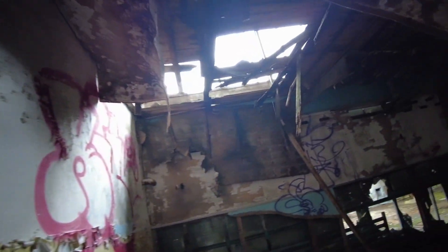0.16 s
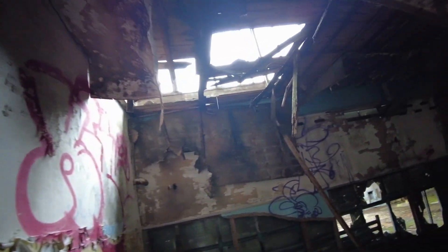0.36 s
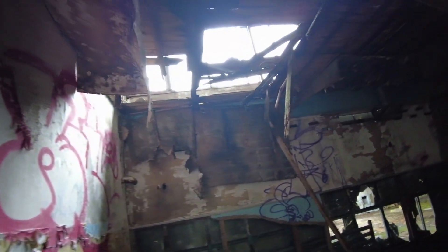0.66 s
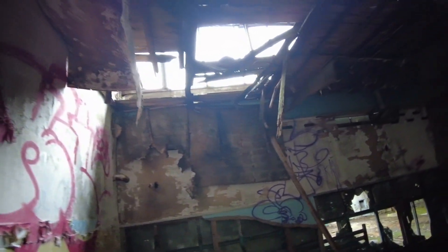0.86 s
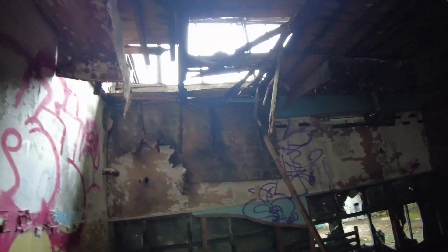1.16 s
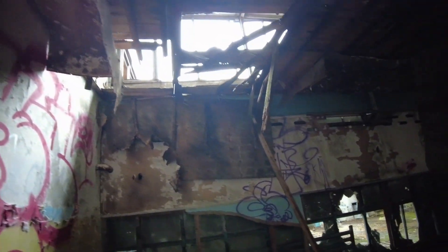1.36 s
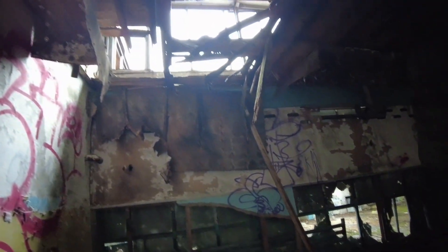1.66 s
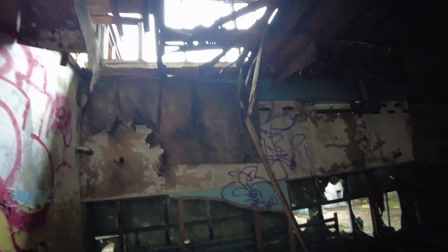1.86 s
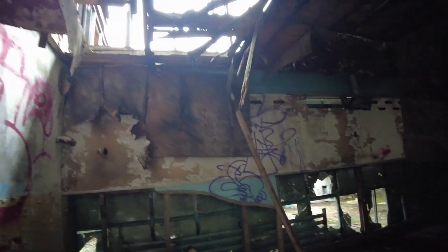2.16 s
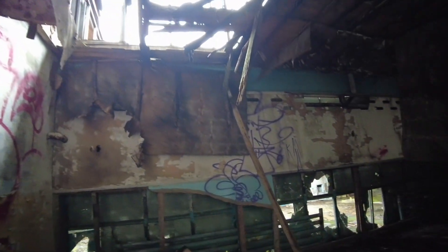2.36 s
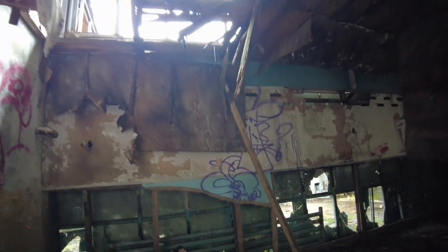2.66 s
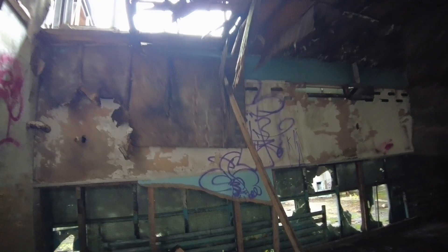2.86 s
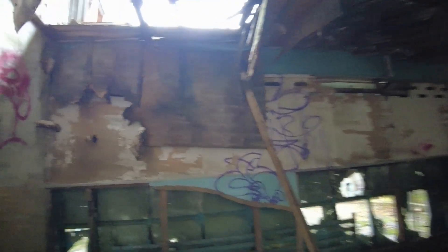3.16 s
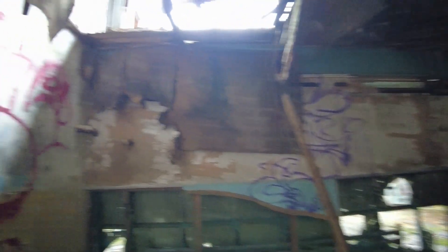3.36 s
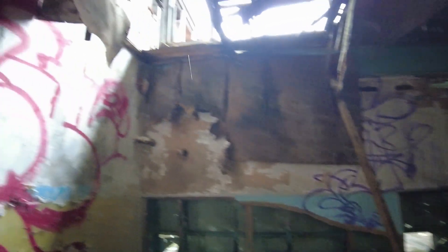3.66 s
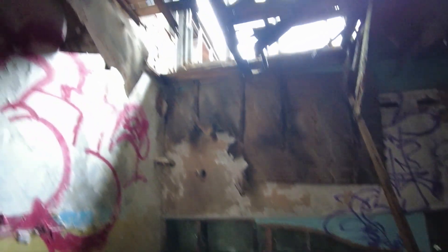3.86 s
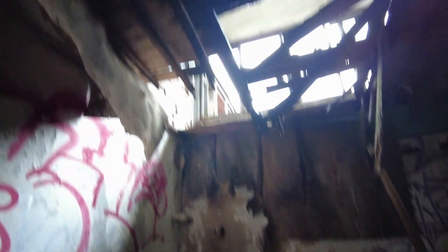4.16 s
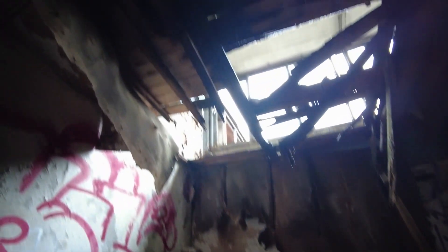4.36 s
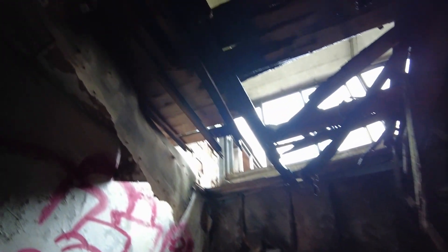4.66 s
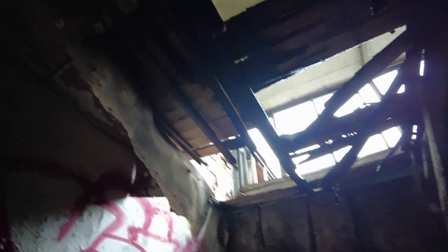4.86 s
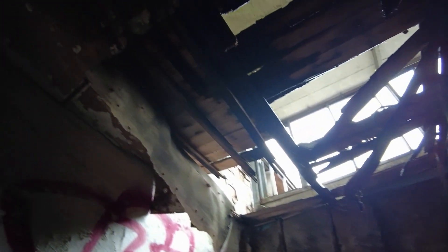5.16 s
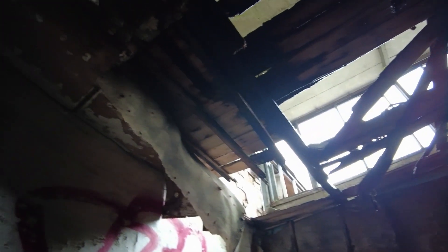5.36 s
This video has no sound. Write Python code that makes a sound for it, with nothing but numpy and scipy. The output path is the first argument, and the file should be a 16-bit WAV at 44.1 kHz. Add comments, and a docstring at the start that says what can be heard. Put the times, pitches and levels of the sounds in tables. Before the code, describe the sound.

Irregular footsteps crunch and crack over rubble and loose boards in a bare derelict building, loudest near three seconds, then almost still.

```python
"""Pieces of rubble and splinters crack and tick, boards knock and a loose panel rings as shoes shift over them.
Soles scuff by stick-slip and grit crunches as dense random grains in a bare, half-roofed building.
Breaks are decaying noise and tones; boards and panel are sums of damped modes.
Near walls return two echoes and a short diffuse tail; below lie a soft outdoor wash and a low air flutter,
both shaped from noise. Left and right differ in phase and level by frequency, which widens the floor sounds."""
import sys
import numpy as np
from scipy import signal
from scipy.fft import rfft, irfft, next_fast_len
from scipy.io import wavfile
from scipy.ndimage import uniform_filter1d

SR = 44100
rng = np.random.default_rng(int(sys.argv[2]) if len(sys.argv) > 2 else 0)


def int16_out(signal):
    """Quantize to a 16-bit WAV file."""
    q = np.round(np.clip(np.atleast_2d(signal).T, -1, 1) * 32767)
    wavfile.write(sys.argv[1], SR, q.astype(np.int16))


N = 243652  # samples

# Grit under the soles. Each row: time in seconds, relative crunch level in dB, sand level over it in dB.
GRIT_COURSE = [(0.0, -64.5, -11), (0.28, -64.5, -14), (0.4, -72, -13), (0.71, -63.5, -4),
               (0.95, -72.5, -11), (1.15, -69.5, -2), (1.19, -62, -6), (1.25, -64, -3), (1.37, -50.5, -15),
               (1.43, -62.5, -15), (1.47, -58, -8), (1.58, -68.5, -2), (1.74, -71.5, -6), (1.8, -53.5, -10),
               (1.9, -56.5, -3.5), (1.93, -52.5, 1.5), (1.96, -55, -2.5), (2.05, -64.5, -5),
               (2.22, -61, -5), (2.3, -53, -6), (2.5, -65.5, -6), (2.67, -65.5, -3), (2.76, -54.5, -2.5),
               (2.95, -55, -8), (3.19, -56, -2.5), (3.26, -56, -40), (3.44, -63, -15), (4.33, -75, -10),
               (4.65, -76.5, -2.5), (4.9, -80, -1.5), (5.52, -78, -6.5)]
SIDES = np.array([[1], [-1]])  # left, right


def undb(db):
    """Level to amplitude: 20 dB is a factor of ten."""
    return 10 ** (np.asarray(db) / 20)


def unit(x):
    """Normalization to a root-mean-square of one."""
    return x / np.sqrt(np.mean(x ** 2))


def band(x, lo_hz, hi_hz):
    """Butterworth band-pass filtering."""
    edges = [lo_hz, min(hi_hz, .45 * SR)]
    return signal.sosfilt(signal.butter(2, edges, "bandpass", fs=SR, output="sos"), x)


def on_log(table, hz):
    """Interpolation of (Hz, value) rows on a log-frequency axis."""
    f, v = np.transpose(table)
    return np.interp(np.log(np.maximum(hz, 1)), np.log(f), v)


def curve(table):
    """Linear interpolation in time of every column after the first."""
    s, *columns = np.transpose(table)
    return [np.interp(np.arange(N) / SR, s, c) for c in columns]


def fade(t, t60):
    """Exponential decay: 60 dB in t60 seconds."""
    return np.exp(-np.log(1000) * t / t60)


def add(out, s, x, pan_db, around=None):
    """Superposition of a sound on three rows: left, right, and what the walls receive."""
    i = int(s * SR)
    size = min(x.shape[-1], N - i)
    out[:2, i:i + size] += x[..., :size] * undb(SIDES * pan_db / 2)
    out[2, i:i + size] += (x if around is None else around)[:size]


def diffuse(gain, size):
    """Coherence: noise alike in the bass, partly opposed near 1 kHz, alike at 1.2 kHz, loosely related above."""
    # Each row: frequency in Hz, likeness of left and right from -1 to 1.
    likeness = [(30, 0.99), (100, 0.96), (300, 0.91), (600, 0.24), (800, -0.13), (950, -0.32),
                (1120, -0.19), (1230, 0.89), (1900, 0.28), (3000, 0.27), (6000, 0.21)]
    hz = np.fft.rfftfreq(size, 1 / SR)
    like = on_log(likeness, hz)
    mid, side = rfft(rng.standard_normal((2, size)))
    return irfft(gain(hz) * (np.sqrt(1 + like) * mid + SIDES * np.sqrt(1 - like) * side), size)


def walk(rate):
    """Smoothed random modulation: levels held 1 / rate seconds, then averaged twice over that time."""
    k = int(SR / rate)
    held = np.repeat(rng.standard_normal(N // k + 1), k)
    return uniform_filter1d(uniform_filter1d(held, k), k)[:N]


def outdoor_wash():
    """Spectrally shaped diffuse noise: a distant wash whose low, middle and high parts swell on their own."""
    # Each row: frequency in Hz, relative spectral level in dB per Hz.
    wash_spectrum = [(45, -21), (70, -6), (210, -8), (550, -10), (980, -3.5), (1540, -11.5), (2300, -27.5),
                     (3200, -21), (7000, -31), (15000, -54)]
    wash_db, swell_db = -60.5, 2.5  # swell before smoothing
    wash = unit(diffuse(lambda f: undb(on_log(wash_spectrum, f)), next_fast_len(N))[:, :N])
    parts = [(60, 258), (260, 986), (1200, 14000)]  # Hz
    return sum(band(wash, lo, hi) * undb(wash_db + swell_db * walk(4.8)) for lo, hi in parts)


def air_flutter():
    """Slow air movement on the microphones: low-frequency noise with a level course and random gusts."""
    # Each row: time in seconds, level before gusts in dB.
    air_course = [(0.0, -54), (0.8, -57.5), (1.5, -62), (2.3, -57), (2.8, -55.5), (3.6, -63), (4.2, -61.5),
                  (5.0, -65.5), (5.52, -58)]
    centre_hz, gusts_per_s, gust_db = 32.5, 13, 4.5  # gust before smoothing
    air = diffuse(lambda f: 1 / (1 + (np.abs(f - centre_hz) / 16) ** 1.96), next_fast_len(N))
    return unit(air[:, :N]) * undb(curve(air_course)[0] + gust_db * walk(gusts_per_s))


def hall(x):
    """Reverberation as convolution with decaying noise: every band of the tail dies at its own rate."""
    # Each row: band centre in Hz, decay time t60 in seconds, relative level in dB.
    tail_bands = [(160, 0.9, -11.5), (380, 0.36, -7.5), (1140, 0.58, -11.5), (2800, 0.48, -11),
                  (5530, 0.38, -8), (14700, 0.26, -16)]
    lump_db, lumps_per_s = 3, 700
    t = np.arange(SR) / SR
    tail = 0
    for hz, t60, db in tail_bands:
        part = diffuse(lambda f: np.exp(-np.log2(np.maximum(f, 1) / hz) ** 2 / 1.66), SR)
        # a band's share of the spectrum grows with its centre
        tail = tail + undb(db) * unit(part) * fade(t, t60) * np.sqrt(2 * hz / SR)
    # the tail sets in after 4 ms
    tail = tail * np.clip((t - .004) / 0.00078, 0, 1) / np.sqrt(0.013 * SR)
    # the young tail is uneven, the late tail smooth
    tail = tail * undb(lump_db * fade(t, 0.18) * unit(walk(lumps_per_s)[:SR]))
    return signal.fftconvolve(x[None], tail * undb(SIDES * 0.26), axes=1)[:, :N]


def near_walls(x):
    """Specular reflection: each near wall returns one delayed, weaker copy."""
    # Each row: delay in seconds, level against the direct sound in dB.
    wall_echoes = [(0.0095, -12.5), (0.0202, -15)]
    echoes = 0
    for s, db in wall_echoes:
        echoes = echoes + undb(db) * np.pad(x, ((0, 0), (int(s * SR), 0)))[:, :N]
    return echoes


def widen(x):
    """Stereo widening: phase and level differ between left and right by frequency, most just below 1.2 kHz."""
    # Each row: frequency in Hz, phase lag of the right channel in radians.
    right_lag = [(200, 0.48), (350, 1.16), (550, 0.97), (850, 1.98), (1120, 2.57), (1230, 0.52),
                 (2500, 1.32), (4000, 1.27)]
    # Each row: frequency in Hz, level of left over right in dB.
    left_over_right = [(60, 0), (500, 3), (3000, -2.5), (14000, 0.5)]
    size = next_fast_len(N)
    hz = np.fft.rfftfreq(size, 1 / SR)
    tilt = undb(SIDES * on_log(left_over_right, hz) / 2)
    turn = np.exp(-1j * on_log(right_lag, hz) * [[0], [1]])
    return irfft(rfft(x, size) * tilt * turn, size)[:, :N]


def grit():
    """Random impulse trains through band-pass filters: dense grains, coarse stones lower than sand."""
    crunch_db, treble_db = curve(GRIT_COURSE)
    stir_db = 5  # before smoothing
    # grains per second, band edges in Hz, level against the crunch in dB
    kinds = [(386.0, 210, 1280, -1.5), (1450, 424, 2820, 0), (1200, 1400, 21800, treble_db)]
    layers = []
    for rate, lo_hz, hi_hz, db in kinds:
        happens, sign, size = rng.random((3, N))
        size_db = np.minimum(-3.5 * np.log(size + 1e-9), 12)
        grains = (happens < rate / SR) * np.sign(sign - .5) * undb(size_db)
        layers.append(undb(db + stir_db * walk(40)) * unit(band(grains, lo_hz, hi_hz)))
    # slightly louder on the left; the tail receives the grit at full level
    return undb(crunch_db) * sum(layers) * undb([[.7], [-.7], [0]])


def scuffs(out):
    """Stick-slip friction of a dragged sole: uneven noise in two resonances over a wide hiss."""
    # Each row: start in seconds, length in seconds, relative level in dB, squeal in Hz, half-width as a
    # share of it, second squeal in Hz, its level over the first in dB, hiss level over the first in dB.
    drags = [(1.351, 0.026, -52, 1430, .06, 3000, -24, -29),
             (1.762, 0.06, -47.5, 1280, 0.093, 3470, -5, 0.5), (2.721, 0.09, -47, 1100, .2, 3300, -4, -5),
             (3.9714, 0.1, -52, 3040, 0.052, 7800, -12, -9),
             (4.638, 0.055, -71.5, 1380, 0.083, 3320, -0.5, -6),
             (5.092, 0.14, -66.5, 1390, .2, 2980, -10, -16)]
    for s, length, db, hz, width, hz2, db2, hiss_db in drags:
        t = np.arange(int(length * SR)) / SR
        grip = undb(4 * np.repeat(rng.standard_normal(200), 100)[:len(t)])  # held for 100 samples
        slip = rng.standard_normal((3, SR // 5))[:, :len(t)] * grip
        squeal = unit(band(slip[0], (1 - width) * hz, (1 + width) * hz))
        second = undb(db2) * unit(band(slip[1], 0.88 * hz2, 0.99 * hz2))
        hiss = undb(hiss_db) * unit(band(slip[2], 2600, 7600))
        ramps = np.minimum(1, np.minimum(t / 0.004, (length - t) / 0.01))
        rub = undb(db) * ramps * fade(t, 0.43) * (squeal + second + hiss)
        add(out, s, rub, .5, undb(3.0) * rub)


def panel(out):
    """Modal vibration: a kicked loose panel rings in damped modes, shared out anew at each blow."""
    # Each row: mode in Hz, relative level in dB, decay time t60 in seconds.
    panel_modes = [(490, -44, 0.064), (955, 3.5, 0.12), (1100, -36, 0.21), (1210, -9, 0.19),
                   (1298, -8, 0.13), (1455, -3, 0.35), (1680, -29, 0.58), (1842, -13.5, 0.14),
                   (2460, -13, 0.18), (2660, -5, 0.12)]
    # Each row: time in seconds, relative level in dB.
    blows = [(2.729, -42), (2.752, -41), (2.822, -29.5), (2.994, -57)]
    t = np.arange(SR // 2) / SR
    for s, db in blows:
        share = undb(1.6 * rng.standard_normal(len(panel_modes)))
        ring = 0
        for g, (hz, mode_db, t60) in zip(share, panel_modes):
            ring = ring + g * undb(mode_db) * fade(t, t60) * np.sin(2 * np.pi * hz * t)
        add(out, s, undb(db) * ring, 1.2)


def knocks(out):
    """Impact and modal decay: a board rings in three modes, the higher dying sooner; the floor thuds."""
    # Each row: time in seconds, relative level in dB, ring in Hz, ring t60 in seconds.
    board_knocks = [(0.223, -38, 640, 0.015), (0.448, -32, 485, 0.012), (0.553, -33.5, 610, 0.017),
                    (0.562, -38.5, 557, 0.018), (0.8499, -38, 1020, 0.014), (0.857, -41, 1050, 0.027),
                    (0.864, -34, 900, 0.01), (0.867, -45, 1200, 0.017), (1.28, -41, 582, 0.064),
                    (1.343, -32.5, 623, 0.027), (1.351, -28, 420, 0.011), (1.3594, -27.5, 583, 0.019),
                    (1.345, -40.5, 221, 0.052), (1.369, -31, 646, 0.015), (1.492, -43.5, 626, 0.045),
                    (1.788, -29, 820, 0.016), (1.796, -29, 587, 0.025), (1.988, -41, 690, 0.027),
                    (2.193, -46.5, 376, 0.056), (2.236, -37, 400, 0.023), (2.244, -34.5, 620, 0.022),
                    (2.256, -13, 383, 0.015), (2.2744, -33, 340, 0.037), (2.311, -32.5, 850, 0.047),
                    (2.75, -34.5, 385, 0.024), (2.291, -38, 330, 0.035), (2.314, -30.5, 350, 0.045),
                    (2.8215, -12.5, 490, 0.017), (2.8229, -16, 915, 0.036), (2.84, -32, 315, 0.02),
                    (2.875, -37, 937, 0.073), (2.851, -31, 590, 0.08), (2.884, -40, 466, 0.0077),
                    (3.163, -39.5, 380, 0.054), (3.242, -39, 453, 0.045), (3.254, -35, 496, 0.033),
                    (3.29, -25, 382, 0.019), (3.303, -41, 403, 0.024), (3.314, -38.5, 292, 0.024),
                    (3.344, -36.5, 205, 0.032), (3.351, -43, 474, 0.03), (3.488, -32, 380, 0.015),
                    (3.491, -41.5, 570, 0.027), (3.503, -47.5, 212, 0.041), (3.541, -44.5, 237, 0.05),
                    (3.809, -52, 390, 0.033), (4.491, -52, 205, 0.022), (4.548, -48, 200, 0.042),
                    (4.567, -47, 260, 0.04), (4.595, -52, 450, 0.033), (4.611, -47, 190, 0.016),
                    (4.68, -48, 220, 0.02), (5.0135, -38, 860, 0.011), (5.016, -49, 720, 0.026),
                    (5.067, -52.5, 330, 0.016)]
    thud_db, thud_db_per_octave = -11, -13  # under a 240 Hz board; lighter boards shake the floor less
    thud_growth = 0.94  # dB of thud per dB of knock, about a -35 dB knock
    floor_hz, slab_hz, slab_db, floor_t60_s = 124.8, 70.4, -11, 0.12  # slab: deeper mode of the floor
    rise_cycles = 0.17  # a sole presses a low board for longer
    modes = [(.66, 0.17), (1, 1), (1.45, 0.29)]  # frequency ratio, gain
    t = np.arange(SR // 4) / SR
    for s, db, hz, t60 in board_knocks:
        floor_db = thud_db + thud_db_per_octave * np.log2(hz / 240) + (thud_growth - 1) * (db + 35)
        board = sum(g * fade(t, t60 / k) * np.sin(2 * np.pi * k * hz * t) for k, g in modes)
        # a small board cannot radiate deep bass
        board = band((1 - np.exp(-t * hz / rise_cycles)) * board, 175, 3500)
        floor = np.sin(2 * np.pi * floor_hz * t) + undb(slab_db) * np.sin(2 * np.pi * slab_hz * t)
        thud = undb(floor_db) * (1 - np.exp(-t / 0.0012)) * fade(t, floor_t60_s) * floor
        knock = undb(db) * (board + thud)
        add(out, s, knock, -2, undb(-2.0) * knock)


def splinters():
    """A random point process: small pieces crack oftener and louder while the grit crunches harder."""
    count, over_crunch_db, spread_db = 75, 2, 5.5
    body_hz, chip_hz = 1600, 3600  # medians
    colour_db = (6.5, 2, -13)  # body, chip, snap
    breaking = (5.5, 0.22, 0.5)  # breaking time in ms, share of ring 0-1, level sent to the walls in dB
    crunch_db = curve(GRIT_COURSE)[0]
    busy = np.cumsum(np.sqrt(undb(crunch_db)))
    times = np.interp(rng.random(count), busy / busy[-1], np.arange(N) / SR)
    size, pitch, chip = rng.standard_normal((count, 3)).T
    levels = crunch_db[(times * SR).astype(int)] + over_crunch_db + spread_db * size
    bodies, chips = body_hz * np.exp(0.36 * pitch), chip_hz * np.exp(0.23 * chip)
    body_db, chip_db, snap_db = colour_db
    return [(s, db, hz, body_db, high_hz, chip_db, snap_db, *breaking)
            for s, db, hz, high_hz in zip(times, levels, bodies, chips)]


def cracks(out):
    """Brittle fracture, a few milliseconds of release: a dull body, a ring, a higher chip and a bright snap."""
    # Each row: time in seconds, relative level in dB, ring in Hz, body under 1.2 kHz in dB, chip in Hz,
    # chip in dB, snap over 7.5 kHz in dB, breaking time in ms, share of ring 0-1, level sent to walls in dB.
    pieces = [(0.0074, -36, 1350, -4, 3080, -37, -48, 2.8, 0.37, -4.5),
              (0.0907, -58, 2000, -13, 5230, 0, -22, 2.9, 0.6, 5),
              (0.1101, -48, 1460, -17, 3030, -8, -29, 3, 0.63, 11),
              (0.1683, -43.5, 1510, -11, 3000, -7.5, -11, 2.7, 0.6, 9.5),
              (0.2224, -31.5, 1900, -7.5, 3440, -24, -15.5, 3.1, 0.32, 2.5),
              (0.2316, -35, 1390, -11, 2580, -5.5, -25, 2.4, 0.54, -17),
              (0.4239, -37, 2620, -3.5, 3900, -4.5, -9, 2.8, 0.3, 5.5),
              (0.447, -22.5, 2050, -38, 3000, -6, -30, 2.14, 0.37, -0.5),
              (0.4553, -28, 1610, -27, 3000, -17, -47, 2.8, 0.7, 6),
              (0.4649, -36.5, 1575, 1, 3030, -6, -46, 5.7, 0.8, -3),
              (0.4786, -28.5, 1680, -26, 4200, -13, -15, 3, 0.4, -4.5),
              (0.4938, -36.5, 1860, -15, 3620, -24, -10, 3.5, 0.35, 5),
              (0.553, -31.5, 1420, -17, 3100, -19, -10, 1.7, 0.65, 6),
              (0.574, -44, 1390, -22, 3600, -4, -11, 7.6, 0.36, 7.5),
              (0.609, -44.5, 1230, -4, 2900, -6, -2, 3.3, 0.5, 1),
              (0.7105, -41.5, 2360, -18, 3430, -0.5, -18, 1.8, 0.3, -3),
              (0.7455, -49.5, 2800, -17.5, 4200, 0.5, 8.5, 2.9, .45, 0.5),
              (0.7707, -48, 1500, -18, 3700, -4, -20, 3.3, 0.3, 3),
              (0.841, -36.5, 1900, -1, 4800, -11, -10, 1.8, 0.54, 3.5),
              (0.8533, -47, 1700, 6.5, 3520, -18, -20, 6.5, 0.8, -6),
              (0.8553, -49.5, 1100, -13, 6100, 8.5, 6, 1.14, 0.27, 4.5),
              (0.8636, -33, 1280, 3, 3370, -25, -12, 2, 0.99, -11),
              (1.0176, -50, 1860, 5, 7660, -1, -13, 2.8, 0.7, -11),
              (1.0555, -53, 1680, 3, 5230, -13, -20, 3.3, .3, -15),
              (1.187, -40, 1630, -0.5, 3760, -2, -12, 2.4, 0.25, 0.5),
              (1.1967, -44.5, 1600, -5, 3940, 3, -15, 1.4, 0.6, -4),
              (1.2777, -26.5, 1345, -13, 2660, -13, -23, 3.5, 0.27, 0.5),
              (1.3785, -27.5, 2300, -13, 4960, -34, -13, 3.1, 0.27, -1),
              (1.381, -38.5, 1500, 11, 4500, 1, -17, 1.8, 0.9, -12),
              (1.399, -49, 1900, -5, 2800, -12, -20, 1.9, 0.7, -8),
              (1.4222, -37.5, 2500, 7, 4600, -0.5, -18, 3.1, 0.9, -3),
              (1.425, -28.5, 2030, -11, 4450, -23, -15, 2, 0.07, 3),
              (1.4605, -39, 2020, -6, 5500, -8, -10, 2, 0.4, -7),
              (1.49, -36, 1550, 10.5, 4800, -0.5, -10, 1.3, 0.6, -13),
              (1.5003, -44, 1230, -5, 4300, -9, -12, 2.2, .45, -7),
              (1.5087, -32, 1460, -3.5, 4400, 0, -17, 2.1, 0.55, 1.5),
              (1.5263, -36.5, 1780, 3, 4500, -17, -6, 2.1, 0.8, -1),
              (1.545, -43, 1310, 2, 3260, -16, -21, 2.9, 0.6, 4),
              (1.767, -40.5, 1290, 1, 3260, -7, -4, 4.9, 0.2, 7.5),
              (1.7959, -32, 1977, 4.5, 3550, 1, -7, 8.2, 0.34, -2.5),
              (1.805, -25.5, 1222, 0, 3240, -8, -24, 5.3, 0.94, -8),
              (1.816, -34.5, 1140, 8.5, 4260, 3, -1, 3.8, 0.4, 7.5),
              (1.9376, -29, 2950, -14, 4600, -4, -18, 1.6, 0.6, 9),
              (1.961, -35.5, 1287, 15, 3170, 6, 1, 7.1, 0.81, -2),
              (1.974, -36.5, 1377, 16, 3000, -1, -10, 2.1, 0.9, -14),
              (1.987, -43, 1600, 8.5, 3470, 8, -14, 3.6, 0.2, 1.5),
              (2.0905, -29, 1610, -4, 6300, -7, -17, 1.9, 0.66, 5),
              (2.095, -41.5, 1490, -8, 6300, 8.5, -22, 1.2, 0.2, 5.5),
              (2.118, -41, 1500, 4, 4600, -4, -18, 1.5, 0.3, 0),
              (2.193, -43, 1310, 7.5, 4500, -2, -20, 1.3, 0.17, 5),
              (2.2255, -53, 2790, -5, 6400, 9, -8, 1.3, 0.5, 8),
              (2.2557, -25.5, 1630, 3.5, 3000, -1, -9, 4.5, 0.37, 1),
              (2.2675, -24, 1420, 1, 3000, -5, -16, 1.6, 0.64, -11),
              (2.278, -33, 1220, -10, 3000, -3, -21, 4.3, 0.8, -10),
              (2.3803, -42, 1216, -5.5, 3000, -5, -2.5, 2.8, 0.2, 5.5),
              (2.654, -61, 3000, -6, 3060, 12, -14, 2.5, 0.7, 14),
              (2.7114, -37, 1210, -9, 3220, -3, -25, 2.7, 0.4, -0.5),
              (2.7277, -31.5, 1455, 6.5, 6400, -5, -14, 1.65, 0.15, 0.5),
              (2.7375, -36.5, 2600, -11, 3300, -3, -25, 1.2, 0.8, -3),
              (2.7515, -29.5, 3000, -3, 6200, 0, -18, 2.4, 0.2, 0),
              (2.761, -28.5, 1420, -1, 3250, -7, -27, 3.9, 0.2, 0),
              (2.7722, -35, 1340, -9, 3160, 5.5, -34.5, 2.2, 0.95, 6),
              (2.8245, -33, 2920, -20, 6400, 4, -16, 3.8, 0.25, 6),
              (2.8133, -29.5, 1140, 6, 3000, -7, -25, 7, 0.4, 1),
              (2.8218, -13, 1395, 4, 3620, -19.5, -9, 3.3, 0.77, 1.5),
              (2.8305, -20.5, 1200, 14, 2600, -1.5, -31, 3, 0.9, -2),
              (2.8356, -19.5, 2740, -12, 3140, -15, -20, 2.3, 0.7, -2),
              (2.85, -30, 1750, 5, 2730, 1, -37, 2.5, 0.3, 1),
              (2.86, -40, 2650, 0, 3360, -4, -25, 2.5, 0.4, 11),
              (2.8768, -31.5, 1200, 2, 2480, -14, -33.5, 2.3, 0.4, -1.5),
              (2.957, -32.5, 1500, -20, 7400, -6, -4, 3.3, 0.6, 7),
              (2.9965, -32.5, 1430, -12, 7400, -0.5, -3, 3.8, 0.33, -1.5),
              (3.092, -40.5, 2960, -3, 6600, 1.5, -8, 2, 0.5, 6),
              (3.131, -49.5, 3000, -8, 6600, 8, -3, 1.2, 0.3, 3),
              (3.16, -39, 1270, -1, 2950, -4.5, -16, 3.2, 0.4, 7.5),
              (3.2088, -36.5, 1290, -16, 4420, -2.5, -41, 2.6, 0.6, -1),
              (3.289, -29, 1770, -2.5, 3200, -10.5, -15, 4.5, 0.17, -2),
              (3.309, -45.5, 1880, 15, 3920, 4, -32.5, 4, 0.9, 3),
              (3.495, -43, 1830, -5, 4620, -3, -7.5, 2.7, 0.2, 8),
              (3.5947, -50.5, 1670, 3, 4300, -5, -1, 3.7, 0.55, -3),
              (3.682, -42.5, 1860, -21, 4380, -6, -10, 3.3, 0.44, 1),
              (3.808, -46, 2700, -4.5, 3100, -1.5, 4, 2.7, 0.37, 4.5),
              (3.984, -42, 2910, -20, 7400, -4, -43, 1.9, 0.4, 0),
              (3.9895, -50, 3150, -14, 6500, -10, -40, 2.5, 0.9, 0),
              (4.0762, -49, 3600, -20, 6000, 10, 7, .7, 0.1, -11),
              (4.0783, -39, 3680, -20, 7900, -12, 11, 1.6, 0.96, 0),
              (4.082, -51.5, 2980, -17, 6300, 13.5, 9, 1.5, 0.24, 5),
              (4.469, -64, 2700, -10, 4300, 3, -10, 2, 0.5, 3),
              (4.597, -55.5, 1500, -2, 4300, -9, -36, 6, 0.66, 6),
              (4.652, -62, 2800, -10, 3200, -3, -24, 5, 0.6, 3),
              (5.0136, -51.5, 1555, 6, 2400, -5, -45, 1.7, 0.97, -6),
              (5.0667, -55, 1700, 9, 3500, -14, -17, .8, 0.3, 1),
              (5.146, -66, 3000, -10, 4500, -3, 6, 1.5, 0.1, 0),
              (5.219, -70.5, 3000, -20, 9300, -6, 13, 2.5, 0.2, 5),
              (5.227, -70, 3000, -20, 9200, 1, 12, 1.5, 0.2, 3),
              (5.415, -55.5, 1725, -14, 3240, -9, -15.5, 4, 0, -10)]
    onset_share = 0.35  # rise time against breaking time
    chip_ring_db = 8.5  # a chip's ring over its rasp
    t = np.arange(SR // 20) / SR
    for s, db, hz, body_db, chip_hz, chip_db, snap_db, ms, hard, walls_db in pieces + splinters():
        crumble = ms / 1000
        shape = (1 - np.exp(-t / (onset_share * crumble))) * np.exp(-t / crumble)
        energy = np.sum(shape ** 2)
        rasp = shape * rng.standard_normal((2, len(t)))
        left, right = rasp * np.sqrt(energy / np.sum(rasp ** 2, axis=1, keepdims=True))
        # summed over all directions the break has an even colour: the walls get one click of the same energy
        click = (t == 0) * np.sqrt(energy)
        # short waves differ between left and right, long ones do not
        long, short = np.array([left, left, click]), np.array([left, right, click])
        parts = [(long, 780, 1200, body_db), (long, 1200, 3200, 0),
                 (short, 3000, 8000, chip_db), (short, 7500, 17000, snap_db)]
        noise = 0
        for k, (x, lo, hi, part_db) in enumerate(parts):
            # neighbouring bands take opposite signs; narrow bands are raised to make up for their width
            noise = noise + (-1) ** k * undb(part_db) * np.sqrt(SR / 2 / (hi - lo)) * band(x, lo, hi)
        # hard pieces ring at a clear pitch, crumbly ones only rasp
        chip = undb(chip_db + chip_ring_db) * fade(t, 0.017) * np.sin(2 * np.pi * chip_hz * t)
        rings = shape * (np.sin(2 * np.pi * hz * t) + chip) * [[1.8], [1.8], [.3]]
        sound = undb(db) * (np.sqrt(1 - hard) * noise + np.sqrt(hard) * rings)
        add(out, s, sound[:2], 2.5, undb(walls_db) * sound[2])


def scene():
    """Superposition of direct sound, early echoes, diffuse tail and background."""
    floor = grit()
    for source in (scuffs, panel, knocks, cracks):
        layer = np.zeros((3, N))
        source(layer)
        floor = floor + layer
    direct = floor[:2] + near_walls(floor[:2])
    return widen(direct) + undb(5.5) * hall(floor[2]) + outdoor_wash() + air_flutter()


def record(dry):
    """Band limiting: a steep elliptic low-pass cuts the top above 15.8 kHz."""
    return signal.sosfilt(signal.ellip(8, .2, 70, 15800, fs=SR, output="sos"), dry)


dry = scene()
out = record(dry)
int16_out(out)
```